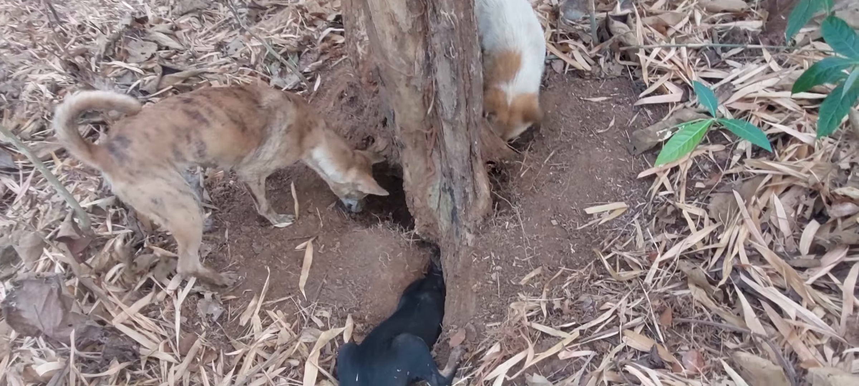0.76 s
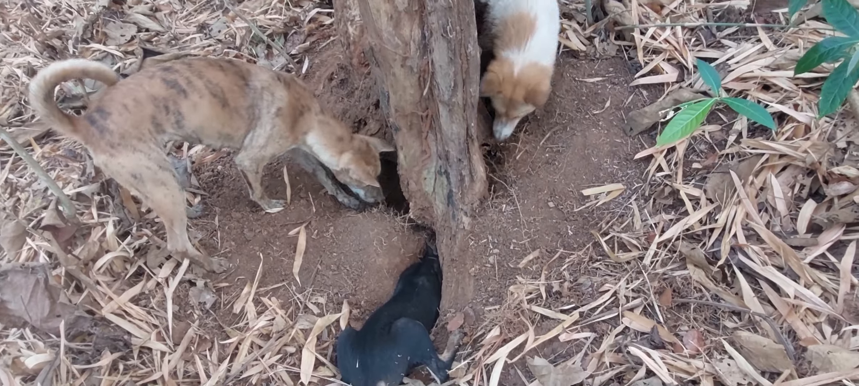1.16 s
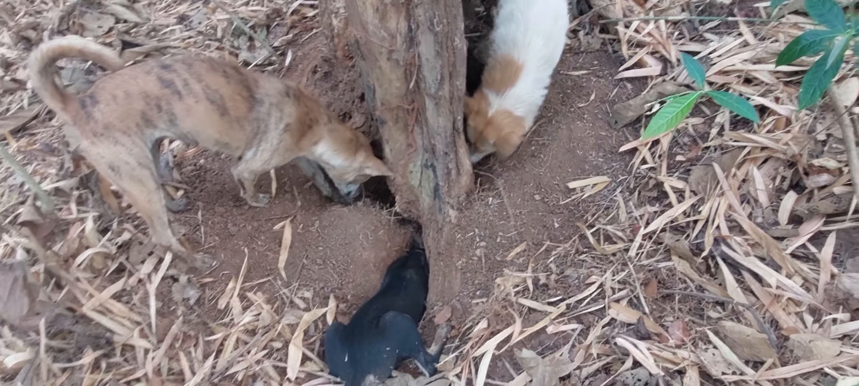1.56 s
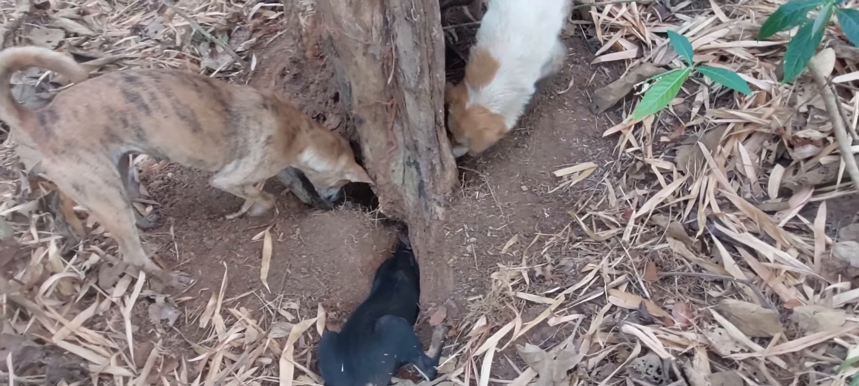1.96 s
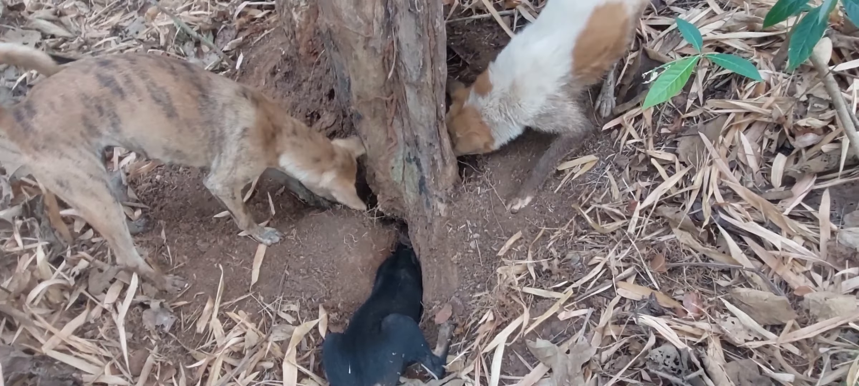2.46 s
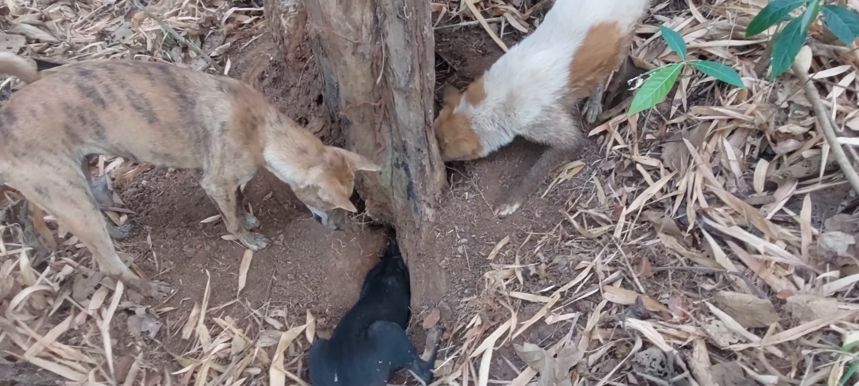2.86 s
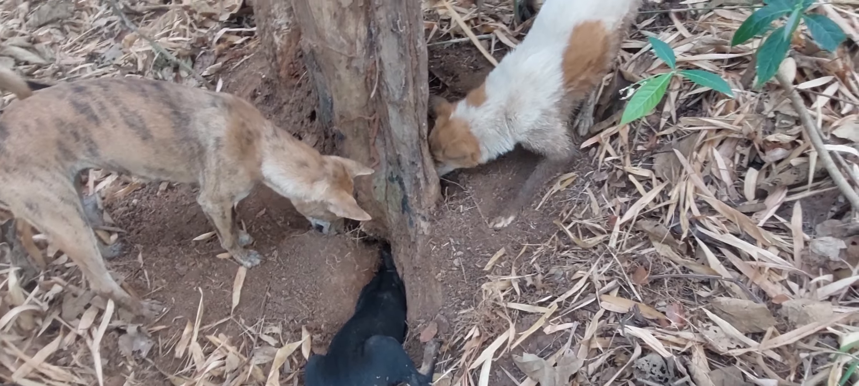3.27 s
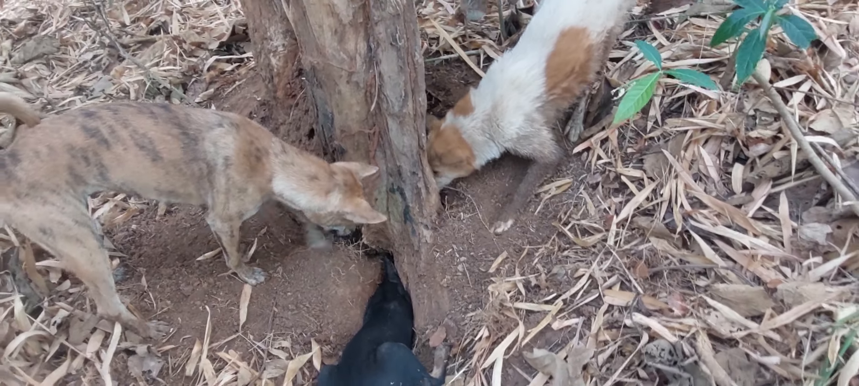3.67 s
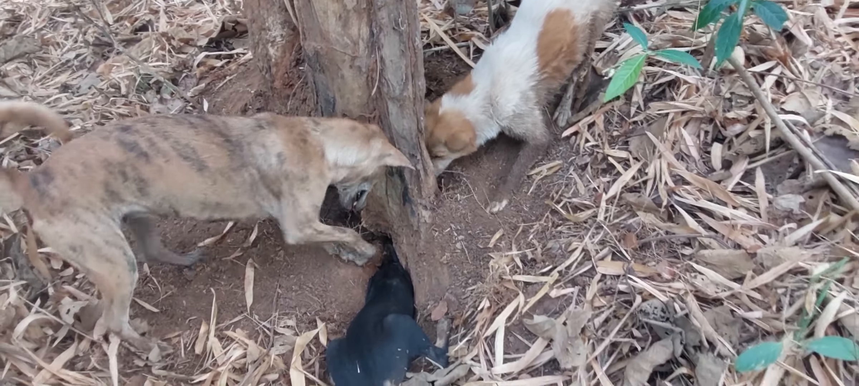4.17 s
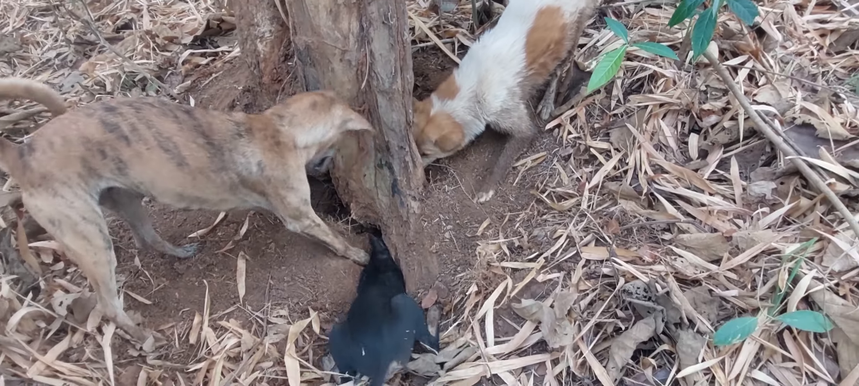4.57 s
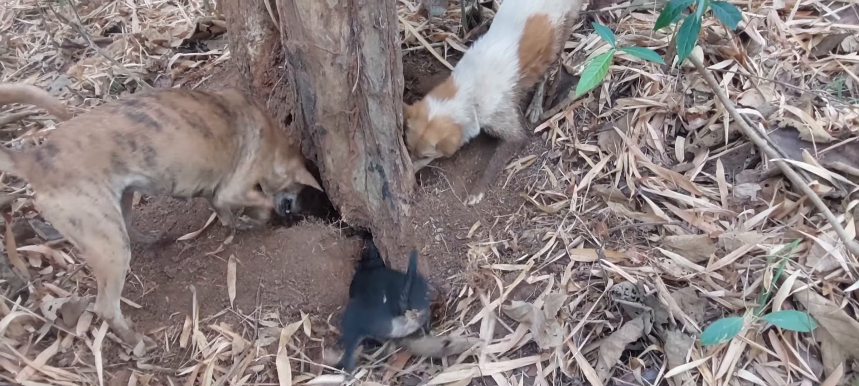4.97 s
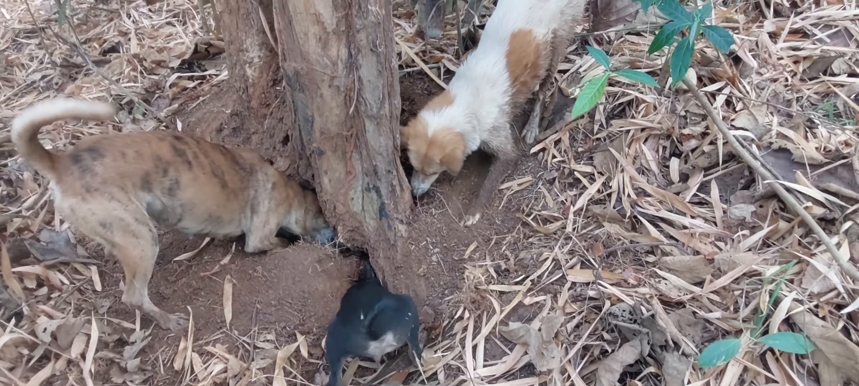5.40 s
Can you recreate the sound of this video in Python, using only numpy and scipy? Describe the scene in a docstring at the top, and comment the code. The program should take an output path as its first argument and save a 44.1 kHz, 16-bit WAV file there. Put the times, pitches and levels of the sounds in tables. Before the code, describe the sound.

Close by, puppies paw at dry leaves and loose soil beside a tree. Small crisp snaps come first, then two very high, short yelps, each ending in a puff of air, with a faint whimper between. Stronger scrapes and rustling follow, a dense burst of twig cracks past the middle, and later a hollow woody knock. Quiet open outdoors, close stereo microphone, digging slightly to the right, faint echo from trees.

```python
"""Puppies dig at the foot of a tree, close by: paws rake dry leaves and loose soil, twigs snap, paws thump.
One puppy gives two short, very high yelps, each ending in a puff of air, and a faint whimper between them.
A hollow root is nudged and knocked; the place is open and quiet, with a faint echo from the trees.
Leaves, soil and breath are shaped noise, litter is a crackle of tiny fractures, voice and root are sines."""
import sys
import numpy as np
from scipy import signal
from scipy.fft import rfft, irfft, next_fast_len
from scipy.io import wavfile
from scipy.ndimage import uniform_filter1d, map_coordinates

SR = 44100
rng = np.random.default_rng(int(sys.argv[2]) if len(sys.argv) > 2 else 0)


def bounce(signal):
    """Save signal as a 16-bit WAV file at the path given by the first command-line argument."""
    frames = np.transpose(np.atleast_2d(signal))
    limited = np.clip(frames, -1, 1)
    pcm = np.round(limited * 32767).astype(np.int16)
    wavfile.write(sys.argv[1], SR, pcm)


N = 270774

# spectrum of rustling dry leaves: (frequency [Hz], relative density [dB per Hz])
LEAF_SPECTRUM = [(500, -41), (1600, -15), (3000, -12.5), (4800, 0.5), (6000, -5.5), (7200, -2),
                 (9300, -7.5), (10800, -3.5), (12000, 4.5), (13500, -0.5), (16000, -3.5)]
# spectrum of small, crisp leaves breaking: (frequency [Hz], relative density [dB per Hz])
CRISP_SPECTRUM = [(800, -43), (3000, -10.5), (7000, -5.5), (9300, -14), (12000, -0.5), (16000, -3)]
# spectrum of claws on hard ground or wood: (frequency [Hz], relative density [dB per Hz])
CLAW_SPECTRUM = [(100, -25), (450, -2.5), (1200, 2.5), (2200, -0.5), (3200, 0.5), (5000, -5), (9000, -11.5),
                 (16000, -22.5)]
# spectrum of air through the puppy's muzzle: (frequency [Hz], relative density [dB per Hz])
MUZZLE_SPECTRUM = [(100, -22), (350, -10.5), (900, -5), (1400, 0.5), (2300, 1.5), (3100, -2.5), (4200, -15),
                   (6500, -12.5), (9500, -26.5), (16000, -29.5)]


def amp(db):
    """Decibels to gain."""
    return 10 ** (np.asarray(db) / 20)


def unit(x):
    """Scale to rms 1."""
    return x / np.sqrt(np.mean(x ** 2) + 1e-20)


def along(points, hz):
    """Read (Hz, value) points on a log frequency axis."""
    f, v = np.transpose(points)
    return np.interp(np.log(hz + 1), np.log(f + 1), v)


def curves(rows):
    """One value per sample for each column after the time."""
    s, *cols = np.transpose(rows)
    return [np.interp(np.arange(N) / SR, s, c) for c in cols]


def wobble(rate):
    """A smooth random curve, rate knots a second."""
    knots = rng.standard_normal(int(N * rate / SR) + 4)
    return map_coordinates(knots, [np.arange(N) * rate / SR])


def filtered(x, response):
    """x times a response of frequency."""
    n = x.shape[-1]
    m = next_fast_len(n + 4096)  # silence after the end, so that little wraps round
    spectrum = rfft(x, m) * response(np.fft.rfftfreq(m, 1 / SR))
    return irfft(spectrum, m)[..., :n]


def coloured(pair, spectrum):
    """Two unrelated signals become stereo sound of rms 1, alike in the bass and apart in the treble."""
    # how alike the two microphone ports hear: (frequency [Hz], left-right correlation [0 to 1])
    likeness = [(40, 0.51), (130, 0.56), (300, 0.75), (1200, 0.59), (2500, 0.23), (5000, 0.14), (12000, .1)]

    def mid_side_response(hz):
        turn = np.arccos(np.clip(along(likeness, hz), -1, 1)) / 2
        return amp(along(spectrum, hz)) * [np.cos(turn), np.sin(turn)]

    mid, side = filtered(pair, mid_side_response)
    return unit(np.array([mid + side, mid - side]))


def noise(spectrum, size=N):
    """Smooth stereo noise with this spectrum, rms 1."""
    return coloured(rng.standard_normal((2, size)), spectrum)


def panned(db):
    """Left and right gains for a left-over-right level difference."""
    return amp(np.array([db, -db]) / 2).reshape(2, -1)


def burst(rise, t60):
    """A half-second envelope with top 1 that swells and dies away."""
    t = np.arange(SR // 2) / SR
    shape = (1 - np.exp(-t / rise)) * amp(-60 * t / max(t60, .003))
    return shape / shape.max()


def held(start, length, db, rise, fall):
    """A gain that climbs to db by the start, holds, and falls away; rise and fall in dB a second."""
    t = np.arange(N) / SR - start
    return amp(db - rise * np.maximum(-t, 0) - fall * np.maximum(t - length, 0))


def shaped(envelope, sound):
    """Sound under an envelope, with the power that the envelope gives."""
    return unit(envelope * sound) * np.sqrt(np.mean(envelope ** 2))


def patchy(pair, depth_db):
    """The colour drifts at random over time and frequency, alike on both sides."""
    z = signal.stft(pair, nperseg=256)[2]
    field = uniform_filter1d(rng.standard_normal(z.shape[1:]), size=6, axis=0)
    field = uniform_filter1d(field, size=16, axis=1)
    return signal.istft(z * amp(depth_db * unit(field)), nperseg=256)[1][:, :pair.shape[1]]


def crackle(spectrum, rate, spread_db, life, patchy_db):
    """Countless tiny fractures, rate a second: mostly small, a few large, each dying over its life [s]."""
    sizes = amp(spread_db * np.minimum(rng.exponential(size=N), 6))
    sizes = sizes * (rng.random(N) < rate / SR)
    power = signal.lfilter([1], [1, -np.exp(-1 / (life * SR))], sizes ** 2)
    grains = np.sqrt(power) * rng.standard_normal((2, N))
    return coloured(patchy(grains, patchy_db), spectrum)


def add(track, s, sound):
    """Mix a sound into the track at time s."""
    start = max(round(s * SR), 0)
    track[..., start:start + sound.shape[-1]] += sound[..., :N - start]


def digging():
    """Paws rake dry leaves, throw grit and push crumbly soil; the pressure trembles within each stroke."""
    # bouts of pawing in the litter, before the tremble: (start [s], length [s], leaf rustle [dB],
    # soil against leaves [dB], left over right [dB])
    bouts = [(0.071, .06, -52.5, -28, -5.5), (0.313, .36, -57.5, -21, -5), (0.768, .11, -40, -18, -1.5),
             (0.908, 0.06, -53.5, -8, -3), (1.55, .4, -60.5, -11.5, -5), (2.067, 0.36, -51, -11.5, -4.5),
             (2.259, .17, -41, -9, -5.5), (2.484, 0.13, -35, -10, -7), (2.724, 0.037, -52, -9.5, -2),
             (2.845, 0.14, -57, -13, -6), (3.329, .55, -44.5, -16.5, -2.5), (3.544, .18, -41.5, -16, -2.5),
             (3.962, .06, -37, -25, -1.5), (4.087, 0.075, -45.5, -14.5, -2), (4.361, .03, -51.5, -24.5, -2),
             (4.474, .06, -57.5, -10, -3), (4.576, .24, -48.5, -24, -2.5), (4.885, .41, -49.5, -19, -4),
             (5.069, .02, -47.5, -15, -1), (5.344, 0.012, -51, -11, -6), (5.621, .1, -46.5, -20.5, -3.5),
             (5.805, 0.23, -46.5, -12, -5)]
    # crumbly soil: (frequency [Hz], relative density [dB per Hz])
    soil_spectrum = [(50, -11.5), (130, -12.5), (500, -3.5), (900, -5), (1600, -7.5), (4000, -9.5),
                     (16000, -44.5)]
    # thrown grit: (frequency [Hz], relative density [dB per Hz])
    grit_spectrum = [(300, -21.5), (700, -14.5), (1200, -4), (2000, 0.5), (2800, 3.5), (4500, -4.5),
                     (9000, -19.5)]
    rise_db_per_s, fall_db_per_s = 259, 122.5  # a bout builds quickly, then the litter settles
    stir_db, stir_soil_db, stir_pan_db = -65.5, -14.5, -8.5  # between bouts the dogs never stand quite still
    grit_db, stray_db = -10, -14.5  # thrown grit, and small dry leaves breaking, against the rustle

    efforts = [(held(s, length, db, rise_db_per_s, fall_db_per_s), soil_db, pan_db)
               for s, length, db, soil_db, pan_db in bouts]
    efforts.append((amp(stir_db) * np.ones(N), stir_soil_db, stir_pan_db))
    # overlapping bouts add in power
    effort = np.sqrt(sum(gain ** 2 for gain, _, _ in efforts))
    in_leaves = np.sqrt(sum((gain * panned(pan_db)) ** 2 for gain, _, pan_db in efforts))
    in_soil = np.sqrt(sum((gain * amp(soil_db)) ** 2 for gain, soil_db, _ in efforts))

    tremble = wobble(45)
    leaves = crackle(LEAF_SPECTRUM, rate=6400, spread_db=2.0, life=0.00016, patchy_db=1.43)
    leaves = in_leaves * amp(2.4 * tremble) * leaves
    grit = crackle(grit_spectrum, rate=1300, spread_db=3.2, life=0.00042, patchy_db=3.5)
    grit = effort * amp(grit_db + 0.98 * tremble) * grit
    soil = crackle(soil_spectrum, rate=600, spread_db=2.4, life=0.0014, patchy_db=2.2)
    soil = in_soil * amp(1.14 * tremble) * soil
    stray = crackle(CRISP_SPECTRUM, rate=45, spread_db=1.5, life=0.00088, patchy_db=3.5)
    stray = in_leaves * amp(stray_db) * stray
    return leaves + grit + soil + stray


def scrapes():
    """A claw tears into the ground and throws a spray on the leaves: two noises under one swell."""
    # claws rip the soil or brush the litter: (time [s], level [dB], rise [s], t60 [s],
    # leaves against claw [dB])
    strokes = [(.093, -61.5, 0.011, 0.066, 21.5), (.38, -60.5, .003, .1, 14.5),
               (1.646, -35.5, .0007, .17, -0.5), (2.253, -33, 0.007, 0.15, 3.5),
               (3.228, -58.5, .008, .25, 4), (3.255, -48, .02, 0.47, 4), (3.58, -43.5, 0.025, 0.34, -2.5),
               (4.865, -46, 0.071, 0.315, -5), (5.629, -40.5, 0.0021, 0.12, 5.5),
               (5.904, -42.5, 0.016, 0.26, -6)]
    out = np.zeros((2, N))
    for s, db, rise, t60, leaf_db in strokes:
        claw = noise(CLAW_SPECTRUM, size=SR // 2)
        leaves = amp(leaf_db) * panned(-7) * noise(LEAF_SPECTRUM, size=SR // 2)  # to the right
        add(out, s, amp(db) * burst(rise, t60) * (claw + leaves))
    return out


def snaps():
    """Each break is a sharp crack of its own colour, then a short splintering; twigs add a woody body."""
    # the louder leaves and twigs: (time [s], level [dB], woody body against crisp [dB],
    # left over right [dB])
    breaks = [(0.2432, -34.5, -19, 0), (.2882, -38, -13, -0.5), (0.3205, -29, -6.5, -2),
              (0.4201, -27, -25, -0.5), (1.0261, -36.5, -13.5, -9.5), (1.0444, -40.5, -21, 1.5),
              (2.3272, -30.5, 6.5, 2.5), (2.7485, -35, -20, -7.5), (2.8216, -28.5, -16, -9),
              (2.949, -35, -31, -6.5), (3.0815, -41, -11, -9), (3.4874, -34.5, -12, -4.5),
              (3.5974, -23, -3, -1.5), (3.6386, -28, 6.5, 0.5), (3.6633, -20.5, -4, -3),
              (3.6802, -17.5, -8.5, 0.5), (3.7217, -27, 0.5, -2), (3.871, -19.5, -19.5, 0.5),
              (4.0959, -33.5, -17, 1), (5.0796, -33.5, -25, 1), (5.105, -37, 5.5, -4.5),
              (5.218, -39, -28, -2), (5.6457, -26, -18, 2)]
    # woody body: (frequency [Hz], relative density [dB per Hz])
    twig_spectrum = [(200, -42.5), (800, -9.5), (1400, -4.5), (2000, -5), (2600, 0), (4400, -1),
                     (6500, -14.5), (16000, -30)]
    crack = burst(rise=0.00045, t60=.009)
    splintering = amp(-11) * burst(rise=.001, t60=.032)
    out = np.zeros((2, N))
    for s, db, body_db, pan_db in breaks:
        colour = noise(CRISP_SPECTRUM, size=SR // 2) + amp(body_db) * noise(twig_spectrum, size=SR // 2)
        sound = shaped(crack + splintering, patchy(colour, 2.0))
        add(out, s, amp(db) * panned(pan_db) * sound)
    return out


def thumps():
    """Soft ground does not ring: each blow is a dull bump of noise gathered around one pitch."""
    # paws and clods on the ground, the first a low bump as a gust strikes the microphone: (time [s], level
    # [dB], spectral peak [Hz], t60 [s])
    blows = [(0.281, -50, 95, .07), (.872, -44, 725, 0.13), (.962, -46.5, 430, 0.19),
             (.985, -51.5, 170, 0.11), (1.671, -52.5, 520, 0.2), (1.884, -59, 120.5, 0.12),
             (2.159, -51.5, 92, 0.13), (2.286, -48.5, 125, 0.072), (2.53, -49, 159, 0.15),
             (2.697, -53, 200, 0.14), (2.76, -57, 302, 0.17), (2.902, -55.5, 150, 0.21),
             (3.336, -54, 460, 0.067), (4.906, -37, 520, .03), (4.93, -40.5, 125, 0.056),
             (5.949, -39.5, 1030, 0.025), (6.11, -48, 380, .27)]
    out = np.zeros((2, N))
    for s, db, hz, t60 in blows:
        ground = [(hz / 8, -40), (hz / 3, -13), (hz * .7, -3), (hz, 0),
                  (hz * 2, -9), (hz * 6, -34), (hz * 14, -68)]
        bump = shaped(burst(t60 / 10, t60), noise(ground, size=SR // 2))
        add(out, s, amp(db) * bump)
    return out


def puppy():
    """Two yelps, each running out in a puff of air, with a whimper and a tiny squeak between them."""
    # the yelps, before roughness: (time [s], pitch [Hz], fundamental [dB], octave [dB])
    long_yelp = [(0.848, 1356, -35.5, -36.5), (0.864, 1385, -32, -16), (0.875, 1589, -10, -14),
                 (0.889, 1616, -8.5, -9), (0.902, 1703, -13, -18.5), (0.922, 1615, -10, -17.5),
                 (0.928, 1403, -22.5, -10.5), (0.941, 1398, -30, -23.5), (0.95, 1175, -13.5, -36),
                 (0.957, 1056, -31.5, -65)]
    short_yelp = [(1.37, 1566, -47, -60), (1.378, 1500, -33, -58), (1.383, 1482, -15.5, -31),
                  (1.39, 1443, -16.5, -26), (1.411, 1461, -13, -25.5), (1.416, 1292, -27.5, -29),
                  (1.422, 1202, -21, -22), (1.427, 1130, -34, -56)]
    # air through the muzzle, after and between the yelps: (time [s], level [dB], rise [s], t60 [s])
    puffs = [(.95, -40.5, .015, .22), (1.24, -63, .06, 0.27), (1.423, -45, 0.017, 0.15)]
    # a faint whimper between the yelps, before its waver: (time [s], pitch [Hz], level [dB])
    whimper_path = [(1.085, 1920, -76), (1.125, 2110, -67), (1.19, 1900, -70), (1.249, 1710, -67),
                    (1.29, 1520, -65), (1.32, 1510, -80)]
    # a tiny nasal squeak before the second yelp, before its waver: (time [s], pitch [Hz], level [dB])
    squeak_path = [(1.335, 4980, -59), (1.346, 5060, -57), (1.357, 5080, -62)]
    out = yelp(long_yelp, port_phase=-1.15, overtone_db=-33)
    out += yelp(short_yelp, port_phase=-.12, overtone_db=-32)
    for s, db, rise, t60 in puffs:
        breath = patchy(noise(MUZZLE_SPECTRUM, size=SR // 2), 1.9)
        add(out, s, amp(db) * shaped(burst(rise, t60), breath))
    return out + whimper(whimper_path) + whimper(squeak_path)


def yelp(rows, port_phase, overtone_db):
    """A tight, almost pure squeal with a strong octave; the voice turns rough where the pitch sags."""
    hz, first_db, octave_db = curves(rows)
    t = np.arange(N) / SR
    voiced = np.clip(np.minimum(t - rows[0][0], rows[-1][0] - t) / 0.001, 0, 1)
    rough = .13 + np.clip((1440 - hz) / 120, 0, .8)
    phase = 2 * np.pi * np.cumsum(hz * (1 + .025 * rough * wobble(600))) / SR
    shimmer = amp(1.8 * rough * wobble(500))
    # the sound reaches the two microphone ports out of step [rad]
    offset = np.array([[port_phase], [-port_phase]]) / 2
    fundamental = amp(first_db) * np.sin(phase + offset) / np.cos(offset)
    octave = amp(octave_db) * np.cos(2 * phase + offset / 2)
    # the faint overtones flutter, and come forward as the voice roughens
    overtones = 0
    for k, db in enumerate([-7, 0, -2], start=3):
        level_db = octave_db + overtone_db + db + 3.5 * rough + 2.4 * wobble(150)
        overtones = overtones + amp(level_db) * np.sin(k * phase)
    hiss = amp(np.maximum(first_db, octave_db) - 29.5) * noise(MUZZLE_SPECTRUM)
    return voiced * ((fundamental - octave + overtones) * shimmer + hiss)


def whimper(rows):
    """A thin whine through the nose: one sine, wavering in pitch and level."""
    hz, db = curves(rows)
    t = np.arange(N) / SR
    voiced = np.clip(np.minimum(t - rows[0][0], rows[-1][0] - t) / .01, 0, 1)
    phase = 2 * np.pi * np.cumsum(hz * (1 + 0.0095 * wobble(150))) / SR
    return voiced * amp(db + 2 * wobble(42)) * np.sin(phase)


def knocks():
    """Blows ring the hollow root's modes; a dull nudge leaves little beyond the lowest one."""
    # nudges and a knock: (time [s], level [dB], contact rise [s], upper modes and tick [dB])
    blows = [(4.46, -59.5, 0.0072, -28.5), (5.049, -49.5, 0.0015, -26), (5.3382, -25, 0.0018, -2)]
    # the root's modes, lowest first: (frequency [Hz], level [dB], t60 [s])
    modes = [(336, 0.5, 0.058), (720, -24, 0.017), (1360, -8, 0.018), (1660, -7, 0.014), (1870, -5, 0.018),
             (3500, -22, 0.01)]
    out, t = np.zeros((2, N)), np.arange(SR // 2) / SR
    for s, db, contact, bright_db in blows:
        lowest, *upper = [amp(level) * burst(contact, t60) * np.sin(2 * np.pi * hz * t)
                          for hz, level, t60 in modes]
        tick = amp(-5.5) * shaped(burst(0.0002, 0.012), noise(CLAW_SPECTRUM, size=SR // 2))
        add(out, s, amp(db) * (lowest + amp(bright_db) * (sum(upper) + tick)))
    return out


def echo(x, decays):
    """A diffuse tail, different on each side, in which each frequency dies at its own speed."""
    _, t, z = signal.stft(rng.standard_normal((2, SR)), SR, nperseg=256)
    # the transform's rows are looked up by their true frequencies
    hz = np.fft.rfftfreq(256, 1 / SR)
    tail = signal.istft(z * amp(-60 * t / along(decays, hz)[:, None]), SR, nperseg=256)[1]
    return signal.fftconvolve(x, tail / np.linalg.norm(tail[0]), axes=1)[:, :N]


def air():
    """Faint outdoor hush, and a draught with a few gusts that buffet the left port most."""
    # gusts on the microphone, before flutter and panning: (start [s], length [s], level [dB])
    gusts = [(0.284, 0.012, -53.5), (0.806, 0.13, -56), (1.031, 0.13, -61), (3.944, .2, -70)]
    # wind rumble on the microphone: (frequency [Hz], relative density [dB per Hz])
    rumble_spectrum = [(15, -32), (35, -9), (70, 0.5), (110, -7.5), (200, -27), (500, -49), (2000, -100)]
    # outdoor hush: (frequency [Hz], relative density [dB per Hz])
    hush_spectrum = [(59, -27), (100, 7), (189, -1), (930, -13.5), (1680, -4.5), (3700, -7.5), (4870, -3),
                     (8830, -10.5), (11900, -10), (16000, -0.5)]
    rise_db_per_s, fall_db_per_s = 504.5, 261
    draught_db, left_over_right_db = -80, 14
    wind = amp(draught_db) + sum(held(s, length, db, rise_db_per_s, fall_db_per_s)
                                 for s, length, db in gusts)
    flutter = amp(1.5 * wobble(15))
    rumble = wind * flutter * panned(left_over_right_db) * noise(rumble_spectrum)
    return amp(-60.5) * noise(hush_spectrum) + rumble


def scene():
    """The dogs close by, the voice scattered by trunk and hollow, all echoed by the trees, in open air."""
    # scatter from the trunk and the dug hollow: (frequency [Hz], t60 [s])
    hollow_decays = [(300, .15), (1500, 0.25), (3000, 0.3), (10000, 0.044)]
    # echo from the trees: (frequency [Hz], t60 [s])
    tree_decays = [(200, .4), (1100, .3), (1480, .3), (1700, 1), (3200, .42), (10000, .2)]
    voice = puppy()
    near = digging() + scrapes() + snaps() + thumps() + knocks() + voice
    scatter = amp(-24.5) * echo(voice, hollow_decays)
    trees = amp(-38.5) * echo(near, tree_decays)
    return near + scatter + trees + air()


def record(dry):
    """The recorder keeps nothing above its band limit."""
    top_hz = 16050
    return filtered(dry, lambda hz: hz < top_hz)


dry = scene()
out = record(dry)
bounce(out)
```